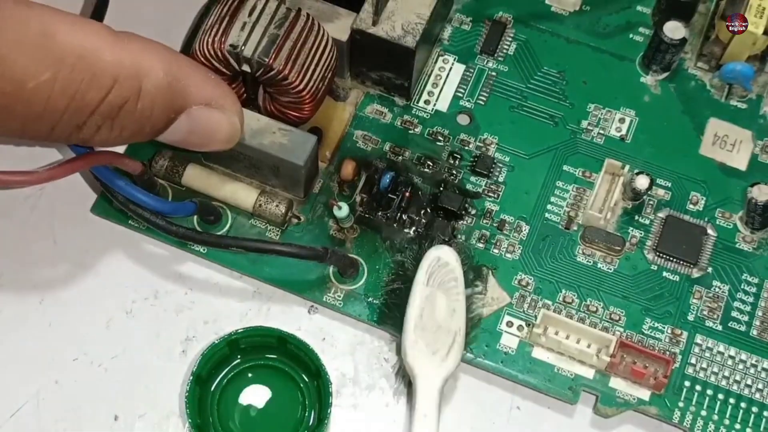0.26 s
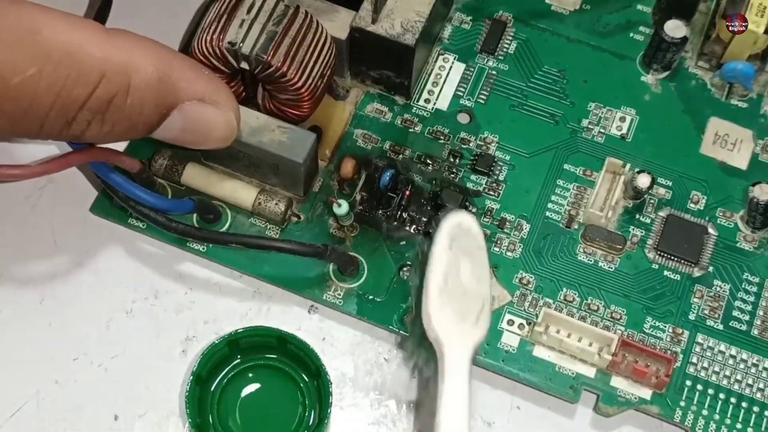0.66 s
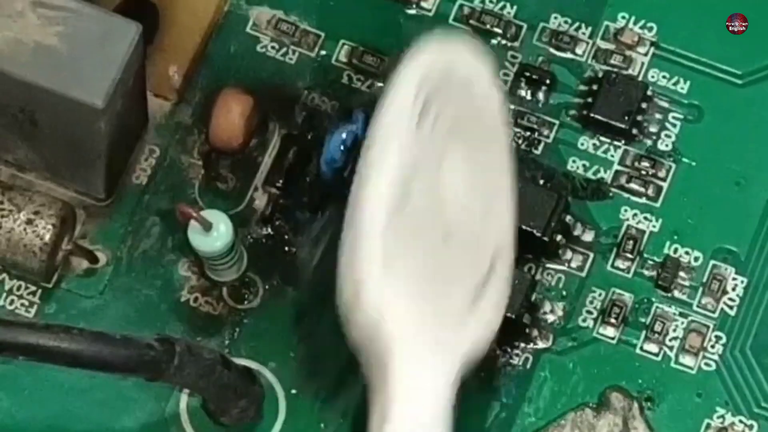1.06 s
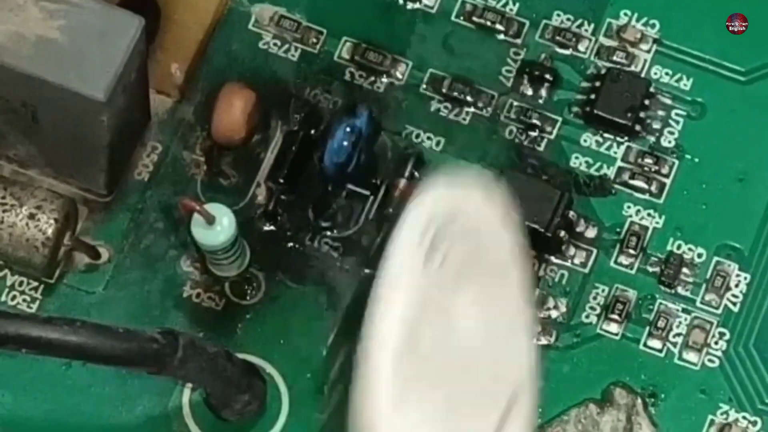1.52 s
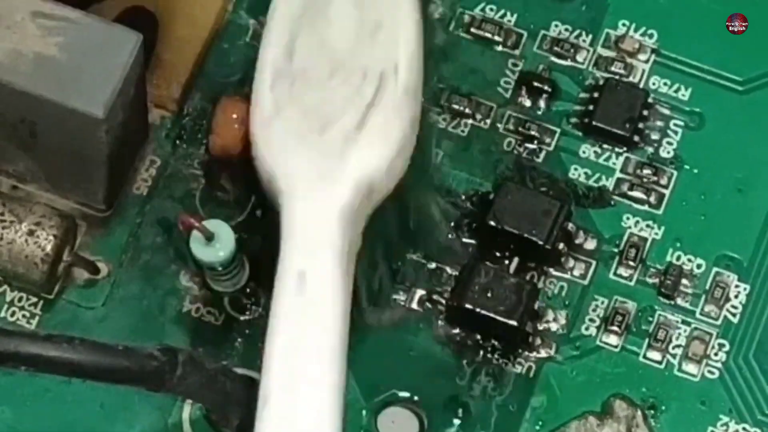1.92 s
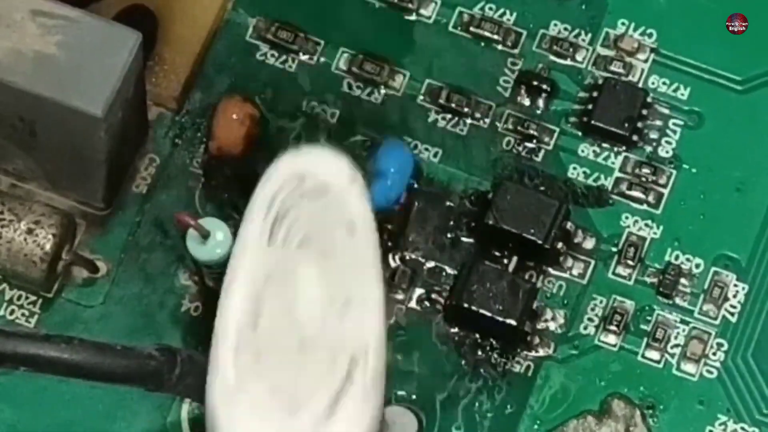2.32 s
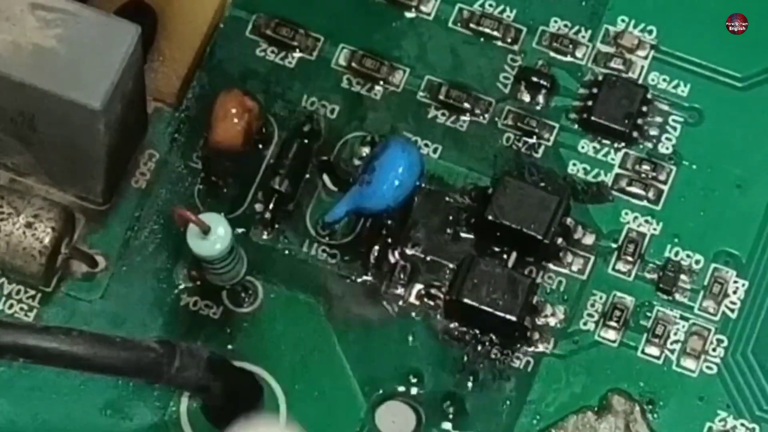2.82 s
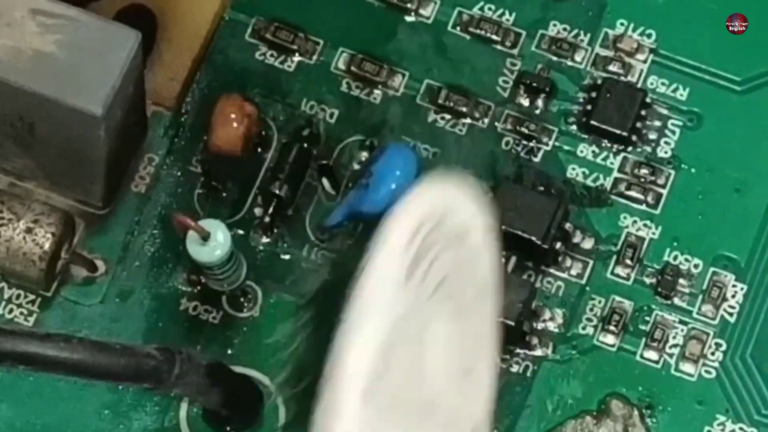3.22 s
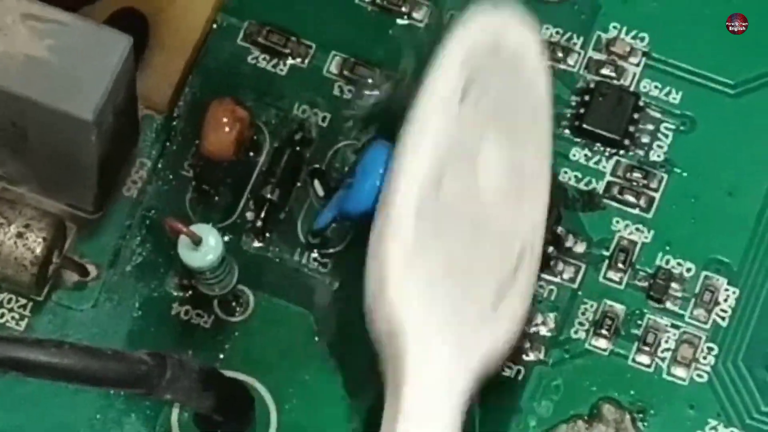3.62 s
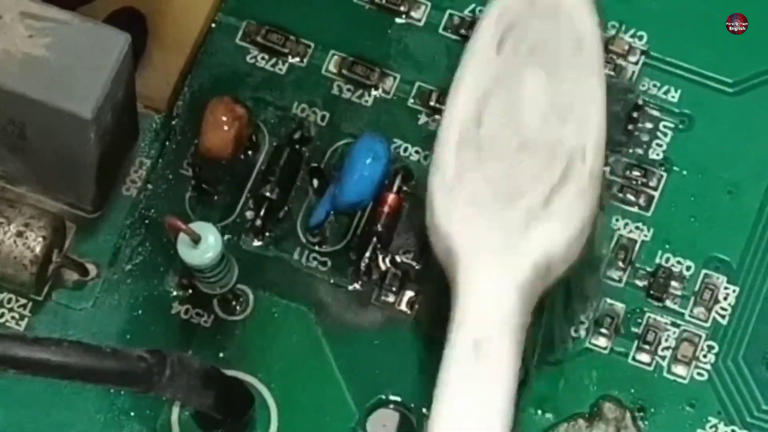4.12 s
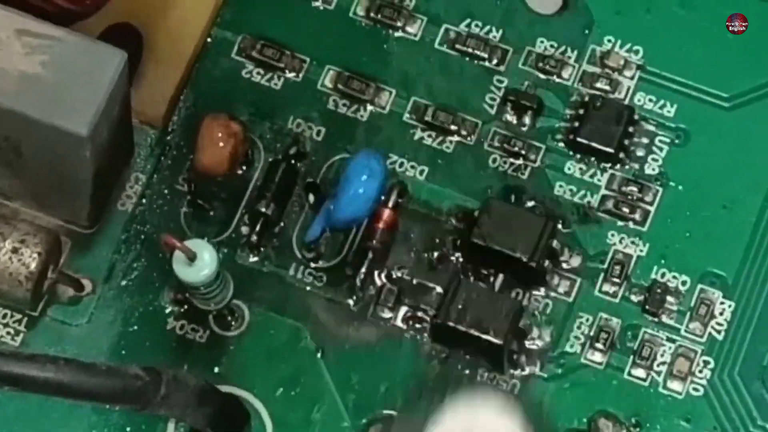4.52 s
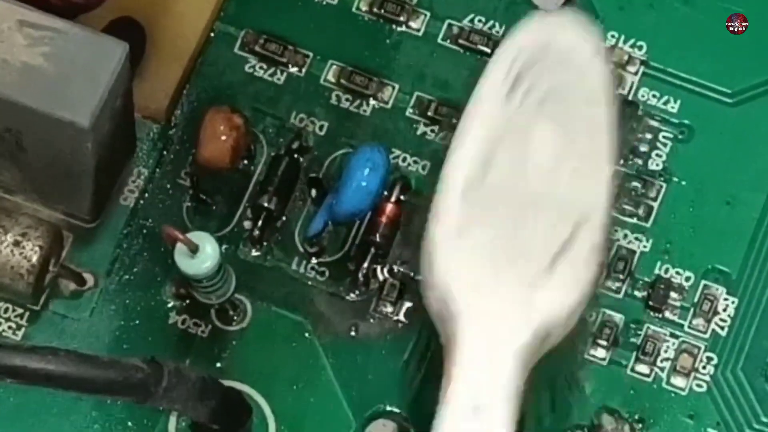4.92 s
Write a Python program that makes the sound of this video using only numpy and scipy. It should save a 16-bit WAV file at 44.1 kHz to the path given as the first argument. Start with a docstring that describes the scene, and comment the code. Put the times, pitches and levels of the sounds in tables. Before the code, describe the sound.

Close, dry stereo phone pickup of brisk brushing: short bursts of grainy hiss with a mid-high rattle, in runs separated by brief gaps. Sharp little snaps stand out, then short wet squeaks cluster past the middle. Beneath are faint board creaks, scrapes and dull bench thumps. The last strokes are slower, spaced apart and knock harder, over a very quiet room rumble.

```python
"""Quick runs of fizzing, scratchy brush strokes with brief pauses, over a faint rumble.
A toothbrush scrubs a wet, burnt circuit board on a workbench in a small, dry room; a phone listens from close by.
Bristles flick off the solder joints: clicks ring the board's resonances and shaped click noise makes the fizz.
Tufts snag on components (struck resonances) and wet bristles squeak (wavering tones). Under the hand
the board creaks and scrapes (noisy clicks through low resonances) and the bench booms (short sine pulses)."""
import sys
import numpy as np
from scipy import signal
from scipy.fft import rfft, irfft
from scipy.io import wavfile
from scipy.ndimage import uniform_filter1d

SR = 44100
rng = np.random.default_rng(int(sys.argv[2]) if len(sys.argv) > 2 else 0)


def int16_out(signal):
    """Quantize to a 16-bit WAV file."""
    q = np.round(np.clip(np.atleast_2d(signal).T, -1, 1) * 32767)
    wavfile.write(sys.argv[1], SR, q.astype(np.int16))


N = 227535  # length in samples


def undb(db):
    """Decibels to gain."""
    return 10 ** (np.asarray(db) / 20)


def unit(x):
    """Scale to rms 1."""
    return x / np.std(x)


def slope(points):
    """Gain on every frequency bin, from (pitch_hz, level_db) points."""
    hz, db = np.transpose(points)
    bins_hz = np.arange(N + 1) * SR / (2 * N)
    return undb(np.interp(np.log(bins_hz + 1), np.log(hz), db))


def shape(x, response):
    """Filter by a response given on the frequency bins."""
    return irfft(rfft(x, 2 * N) * response)[..., :N]


def curve(points):
    """Gain over time, from (time_s, level_db) points."""
    return undb(np.interp(np.arange(N) / SR, *np.transpose(points)))


def arch(start, length):
    """A rounded swell from 0 to 1 and back."""
    way = np.clip((np.arange(N) / SR - start) / length, 0, 1)
    return np.sqrt(4 * way * (1 - way))


def band(x, low_hz, high_hz, order=4):
    """Band-pass; a higher order has steeper edges."""
    return signal.sosfilt(signal.butter(order, [low_hz, high_hz], "band", fs=SR, output="sos"), x)


def walk(rate):
    """Smooth random wander with a spread near 1, taking `rate` new values a second."""
    k = int(SR / rate)
    steps = np.repeat(rng.standard_normal(N // k + 1), k)
    return 1.445 * uniform_filter1d(uniform_filter1d(steps, k), k)[:N]


def ring(x, modes):
    """Drive a set of resonances; neighbours swing in opposite directions."""
    total = 0
    for k, (hz, width, db) in enumerate(modes):
        b, a = signal.iirpeak(hz, hz / width, fs=SR)
        total = total + (-1) ** k * undb(db) * signal.lfilter(b, a, x)
    return total


def roaming(force, modes, wander_db, rate):
    """As the contact point moves, the same force is shared out differently among the resonances."""
    shares = undb(wander_db * np.array([walk(rate) for _ in modes]))
    _, width, db = np.transpose(modes)
    # hold the summed power of the resonances steady
    shares /= np.sqrt((width * undb(db) ** 2) @ shares ** 2)
    return sum((-1) ** k * ring(force * shares[k], [mode]) for k, mode in enumerate(modes))


PORT_LAG_S = 0.00009  # mean delay of the clicks at the phone's right microphone port


def flicks(rate, scatter_db, spread_s):
    """Random clicks of uneven size; each starts at another spot, so its lag between the ports differs."""
    at = np.flatnonzero(rng.random(N) < rate / SR)
    sign, size, lag = rng.standard_normal((N, 3))[at].T
    size = np.sign(sign) * undb(scatter_db * np.clip(size, -2, 2))
    lag_samples = np.round((PORT_LAG_S + lag * spread_s) * SR).astype(int)
    late = np.clip(at + lag_samples, 0, N - 1)
    return np.array([np.bincount(at, size, N), np.bincount(late, size, N)])


# colour of the workshop's air before scaling: pitch_hz, level_db
ROOM_TONE = [(20, -17), (55, -38), (88, -4), (140, -14.5), (280, -11.5), (500, -17), (1000, -24),
             (2500, -35), (4800, -40.5), (15000, -31)]
ROOM_TONE_DB = -74.5  # rms


def room_tone():
    """The faint rumble of the workshop: shaped noise, mostly alike at both ports."""
    air = rng.standard_normal(N) + 0.5 * rng.standard_normal((2, N))
    return undb(ROOM_TONE_DB) * unit(shape(air, slope(ROOM_TONE)))


# brush strokes on the board: start_s, length_s, level_db (before the balance of ring, fizz and squeal)
STROKES = [(-0.035, 0.045, -43.5), (0.045, 0.11, -47), (0.171, 0.12, -45.5), (0.325, 0.099, -45.5),
           (0.447, 0.083, -44.5), (0.826, 0.088, -51.5), (0.916, 0.097, -46.5), (1.067, 0.098, -48),
           (1.191, 0.12, -46.5), (1.324, 0.11, -45.5), (1.439, 0.093, -46.5), (1.737, 0.086, -48.5),
           (1.828, 0.076, -49.5), (1.929, 0.087, -46), (2.051, 0.092, -47), (2.18, 0.085, -46.0),
           (2.271, 0.13, -49), (2.414, 0.084, -45.0), (2.518, 0.093, -47.0), (2.648, 0.088, -46.5),
           (2.76, 0.089, -46.5), (3.076, 0.21, -46.5), (3.311, 0.087, -44), (3.438, 0.086, -45),
           (3.574, 0.089, -46.5), (3.664, 0.093, -45.5), (3.804, 0.075, -45.5), (3.91, 0.077, -47),
           (4.125, 0.18, -44), (4.347, 0.24, -46.0), (4.717, 0.13, -44.0), (4.985, 0.087, -40.5)]
# times of picking up speed, braking and the bent bristles dragging on, and the drag's share of the level
RISE_S, BRAKE_S, DRAG_S, DRAG_SHARE = 0.036, 0.021, 0.099, 0.31


def strokes():
    """Strength of the rubbing: each stroke picks up speed, holds it, brakes and drags out."""
    power = np.zeros(N)
    for start, length, db in STROKES:
        age = np.arange(N) / SR - start
        over = np.maximum(age - length, 0)
        attack = np.sin(np.pi / 2 * np.clip(age / RISE_S, 0, 1)) ** 2
        brake = (1 - DRAG_SHARE) * np.exp(-over / BRAKE_S)
        drag = DRAG_SHARE * np.exp(-(over / DRAG_S) ** 1.5)
        power += (undb(db) * attack * (brake + drag)) ** 2
    return np.sqrt(power)


def tufts(rate, decay_s, depth):
    """Bunches of bristles let go at once and thin out: a saw-toothed gain."""
    releases = (rng.random(N) < rate / SR) * np.minimum(rng.exponential(size=N), 3)
    return 1 + depth * signal.lfilter([1], [1, -np.exp(-1 / (decay_s * SR))], releases)


def wandering_echo(x, lag_s, swing, strength):
    """A short echo with a wandering delay sweeps a comb through the fizz, so its colour keeps changing."""
    n = np.arange(N)
    echoed = []
    for port in x:
        lag = lag_s * SR * (1 + swing * walk(9))
        echoed.append(port + strength * np.interp(n - lag, n, port))
    return np.array(echoed)


# resonances of the loaded board: pitch_hz, width_hz, level_db (relative)
BOARD_MODES = [(1508, 145, -6), (1630, 72, 1.5), (1889, 107, -6), (2300, 226, -9), (2506, 130, -5),
               (2920, 166, -5), (3300, 120, -12), (3630, 320, -12.5)]
# colour of the fine wet tips: pitch_hz, level_db (relative)
FIZZ = [(300, -17.5), (1100, -22.5), (1700, -6), (3600, -5.5), (4700, -3.5), (5500, -1), (6500, 1.5),
        (7500, -0.5), (8700, -6), (10200, -0.5), (12500, -4), (15200, 1.5)]
# resonances heard when bristles stick and squeal: pitch_hz, width_hz, level_db (relative)
SQUEAL_MODES = [(3294, 160, -1.5), (3450, 140, 5), (3700, 300, -7), (6420, 300, -13.5)]
# how far the rubbing favours the board's ring over the fizz: time_s, level_db
BITE = [(.1, -2), (.55, -3.5), (1.05, -2), (1.85, -0.5), (2.2, 4), (2.4, -2), (2.8, -3.5), (3.15, 0.5),
        (4.2, 1.5), (5.05, 2)]
# how strongly the wet bristles grip and squeal: time_s, level_db
GRIP = [(.1, -12), (.85, -7.5), (.97, -1.5), (1.42, -2), (1.5, -29), (1.9, 4.5), (2.15, 3), (2.5, -5.5),
        (2.75, -2.5), (3.1, -16), (3.38, -1.5), (3.63, 2.5), (3.85, -21), (5, -32)]
RING_DB, FIZZ_DB, SQUEAL_DB = -2, 0.5, -3  # against the stroke, before bite and grip


def scrubbing():
    """Bristles flick off the joints and ring the board, their wet tips fizz, and some stick and squeal."""
    # the root splits the bite evenly: half raises the ring, half lowers the fizz
    bite = np.sqrt(curve(BITE))
    bunches = tufts(rate=110, decay_s=0.0059, depth=0.24)
    heavy = flicks(2600, scatter_db=3.5, spread_s=0.00006) * bunches
    body = band(roaming(heavy, BOARD_MODES, wander_db=3.5, rate=22), 1290, 4600, order=4)
    # the fine tips are far more numerous, and too light to move the board much
    light = flicks(10000, scatter_db=2.0, spread_s=0.0002) * bunches ** 1.22
    fizz = wandering_echo(shape(light, slope(FIZZ)), lag_s=0.000875, swing=0.204, strength=0.81)
    # stick-slip comes in short fits
    fits = flicks(3000, scatter_db=1.5, spread_s=0.0001) * undb(3.7 * walk(110))
    squeal = band(roaming(fits, SQUEAL_MODES, wander_db=7.5, rate=30), 3270, 7700, order=3)
    mix = undb(RING_DB) * bite * unit(body)
    mix += undb(FIZZ_DB) / bite * unit(fizz)
    mix += undb(SQUEAL_DB) * curve(GRIP) * unit(squeal)
    return strokes() * mix


# creaks as the stroke presses the board down, and as it springs back when the brush lifts
PRESS_DB, PRESS_S = -68, 0.089
LIFT_DB, LIFT_S, LIFT_AFTER_S = -64.5, 0.12, 0.0064
PAUSE_S = 0.12  # a gap between strokes longer than this lifts the brush


def creaking():
    """Strength of the board's flexing: a swell as each stroke presses, another when the brush lifts."""
    gain = np.zeros(N)
    next_starts = [row[0] for row in STROKES[1:]] + [np.inf]
    for (start, length, _), next_start in zip(STROKES, next_starts):
        gain += undb(PRESS_DB) * arch(start, PRESS_S)
        if next_start - start - length > PAUSE_S:
            gain += undb(LIFT_DB) * arch(start + length + LIFT_AFTER_S, LIFT_S)
    return gain


# low resonances of the flexing board: pitch_hz, width_hz, level_db (relative)
FLEX_MODES = [(160.6, 13, -17), (217, 25.5, -2), (257.6, 30, 0.5), (304.3, 28, -2), (360.5, 37, -6),
              (422.7, 29.7, -7)]
# resonances of its scraping edge: pitch_hz, width_hz, level_db (relative)
SCRAPE_MODES = [(403, 64, -1.5), (622, 16, 4.5), (698, 65, -2.5), (804, 65, -16)]
# colour of the flexing, upper modes over lower ones, mostly higher later on: time_s, level_db
FLEX_TILT = [(.5, -6.5), (1.2, 1.5), (2.3, -4.5), (3.2, 7), (4.1, 8), (5, 3.5)]
FLEX_SPLIT_HZ = 270  # between lower and upper flexing modes
# the board sliding a little on the bench: start_s, length_s, flex_level_db, scrape_level_db, scrape_top_hz
SLIDES = [(0.025, .2, -76, -62, 600), (0.296, 0.16, -78, -61, 680), (0.393, 0.1, -59, -61.5, 585),
          (1.128, 0.1, -62.5, -78, 520), (2.349, 0.16, -62.5, -62, 725), (2.43, .22, -60.5, -59, 726),
          (2.647, 0.15, -66, -66, 730), (2.777, 0.16, -74, -58.5, 785), (3.11, 0.11, -67, -69, 466),
          (3.302, .055, -60, -69, 480), (3.988, 0.057, -65, -84, 560), (4.188, .1, -56, -64, 810),
          (4.414, 0.12, -58, -76, 570), (4.568, 0.1, -50, -65, 640), (4.731, 0.098, -56.5, -58.5, 760),
          (5, 0.082, -56.5, -57.5, 784)]


def shifting(lumpy_db=1.0):
    """The board judders on the bench: random slips ring its low flexing modes and its scraping edge."""
    low = roaming(flicks(500, scatter_db=2.0, spread_s=0.00039), FLEX_MODES, wander_db=5, rate=12)
    high = roaming(flicks(500, scatter_db=2, spread_s=0.0004), SCRAPE_MODES, wander_db=3.0, rate=14)
    tilt = curve(FLEX_TILT)
    lower = unit(band(low, 175, FLEX_SPLIT_HZ, order=3))
    upper = unit(band(low, FLEX_SPLIT_HZ, 514, order=3))
    flex = (lower + tilt * upper) / np.hypot(1, tilt)
    out = flex * creaking() * undb(lumpy_db * walk(25.18))
    for start, length, flex_db, scrape_db, top_hz in SLIDES:
        scrape = unit(band(high, 387, top_hz))
        out += arch(start, length) * (undb(flex_db) * flex + undb(scrape_db) * scrape)
    return out


def blows(hits, modes, decay_s, rattle, breadth):
    """Each (start_s, level_db, pitch_hz) is a click and short rattle, ringing modes near that pitch most."""
    out, t = np.zeros((2, N + SR)), np.arange(SR // 8) / SR
    for s, db, hz in hits:
        force = (t == 0) + rattle * rng.standard_normal((2, len(t))) * np.exp(-t / decay_s)
        sound = ring(ring(force, modes), [(hz, breadth * hz, 0)])
        i = int(s * SR)
        out[:, i:i + len(t)] += undb(db) * sound / np.abs(sound).max()
    return out[:, :N]


# tufts that catch and let go: start_s, level_db (peak before trim and band-pass), pitch_hz (favoured)
SNAGS = [(0.0273, -29.5, 1750), (0.168, -30.5, 2100), (0.3606, -29.5, 1640), (0.8538, -35.5, 1640),
         (1.2871, -20.5, 2630), (1.3602, -34.5, 1600), (1.884, -27.5, 1630), (3.326, -30, 1610),
         (3.5234, -28.5, 1490), (4.2426, -25, 1550), (4.377, -28, 3120), (4.7578, -21.5, 2300),
         (5.017, -30.5, 2010)]
# hard landings of the brush that knock the board on the bench: start_s, level_db (peak before band-pass)
KNOCKS = [(4.7571, -33), (5.016, -33.5)]
# the board pressed hard onto the bench, ringing only briefly: pitch_hz, width_hz, level_db (relative)
KNOCK_MODES = [(307, 76, 1.5), (520, 82, -3.5), (680, 110, 2.5), (820, 120, -4)]
KNOCK_HZ = 650  # pitch the knocks favour


def snags():
    """A caught tuft snaps free and rings the board; a hard landing also knocks it on the bench."""
    snap = blows(SNAGS, BOARD_MODES, decay_s=0.0027, rattle=0.21, breadth=0.5)
    landings = [(s, db, KNOCK_HZ) for s, db in KNOCKS]
    knock = blows(landings, KNOCK_MODES, decay_s=0.0048, rattle=0.08, breadth=1.2)
    return undb(-1.5) * band(snap, 1320, 6500) + band(knock, 175, 1340)


# the hand's weight bumping the bench: start_s, level_db (before the trim)
BUMPS = [(0.452, -54.5), (1.189, -45.5), (1.307, -45), (2.52, -46.5), (2.901, -52.5), (3.319, -57.5),
         (4.05, -57), (5.019, -44)]
BENCH_HZ = 88.2  # lowest mode of the bench top


def bumps(push_s):
    """Soft pushes of the hand set the bench top booming: a sine that swells and dies away."""
    out, t = np.zeros(N), np.arange(N) / SR
    for s, db in BUMPS:
        age = np.maximum(t - s, 0) / push_s
        push = (age / 2) ** 2 * np.exp(2 - age)  # reaches 1 at twice push_s
        out += undb(db) * push * np.sin(2 * np.pi * BENCH_HZ * (t - s))
    return undb(-7.5) * out


# stick-slip squeaks of wet bristles: crest_s, level_db (before roughness and trim), swell_s
SQUEAKS = [(1.138, -33.5, 0.01), (2.021, -31, 0.0059), (2.236, -36, 0.0041), (2.265, -33, .0078),
           (2.358, -33, .0053), (3.25, -32, 0.0051), (3.373, -19, 0.006), (3.384, -29, 0.0019),
           (3.396, -19, 0.0034), (3.464, -34, .021)]
SQUEAK_HZ = 3345  # centre of the wavering pitch


def squeaks(waver=0.0168, rough_db=2, octave_db=-31, release_s=0.0034, port_lag_s=0.00011):
    """Stick-slip holds near one pitch, swells and breaks off; the right port is over a third of a cycle late."""
    out, t = np.zeros((2, N)), np.arange(N) / SR
    drift, grip = 1 + waver * walk(350), undb(rough_db * walk(400))
    lags = np.array([[0], [port_lag_s]])
    for s, db, swell in SQUEAKS:
        near = np.abs(t - s) < 0.08
        age = t[near] - s
        envelope = np.exp(-(age / np.where(age < 0, swell, release_s)) ** 2 / 2)
        phase = 2 * np.pi * SQUEAK_HZ * (np.cumsum(drift[near]) / SR - lags)
        tone = np.sin(phase) + undb(octave_db) * np.sin(2 * phase)
        out[:, near] += undb(db) * envelope * grip[near] * tone
    return undb(-0.5) * out


def reflections(x, wet_db, t60):
    """Dense, slightly dull reflections of the room that differ at each port."""
    t = np.arange(SR // 2) / SR
    noise = band(rng.standard_normal((2, len(t))), 140, 8000, order=1)
    tail = noise * np.exp(-np.log(1000) * t / t60)
    tail *= undb(wet_db) / np.linalg.norm(tail, axis=1, keepdims=True)
    return x + signal.fftconvolve(x, tail, axes=1)[:, :N]


def scene():
    """Brush and board on the bench of a small, dry room."""
    close = scrubbing() + shifting() + snags() + squeaks()
    return room_tone() + reflections(close, wet_db=-12.5, t60=0.18) + bumps(push_s=0.011)


# the phone's two microphone ports face different ways: pitch_hz, level_db (left minus right)
BALANCE = [(90, 1.5), (200, -7.5), (700, -0.5), (2250, -1), (2580, -4.5), (2920, 5.5), (3450, -4),
           (5800, -1.5), (7400, -7), (8700, 0.5), (10200, 10), (15000, 0.5)]
TOP_HZ = 15500  # the phone passes nothing much above this


def record(dry):
    """Each port colours the sound its own way, and the phone cuts the top."""
    lean = slope(BALANCE)
    # the two ports' summed power stays even at every pitch
    ports = np.array([lean, np.ones_like(lean)]) * np.sqrt(2 / (1 + lean ** 2))
    coloured = shape(dry, ports)
    return signal.sosfilt(signal.ellip(12, 0.2, 70, TOP_HZ, fs=SR, output="sos"), coloured)


dry = scene()
out = record(dry)
int16_out(out)
```